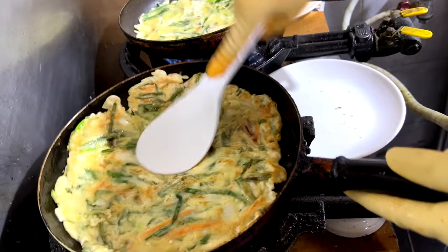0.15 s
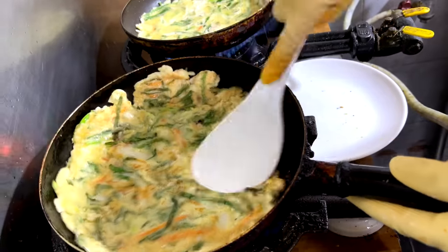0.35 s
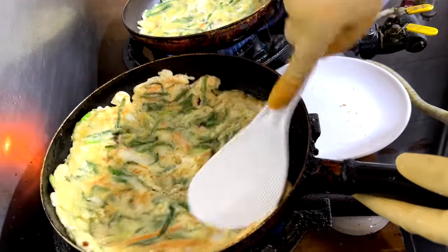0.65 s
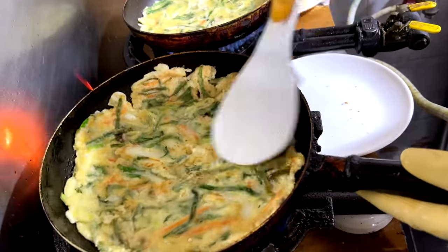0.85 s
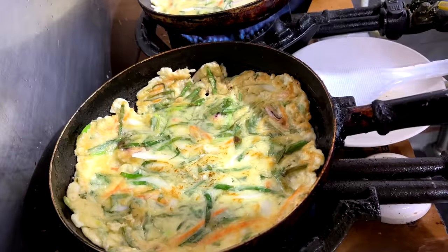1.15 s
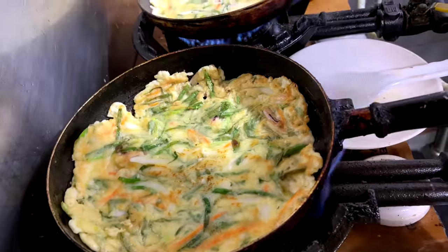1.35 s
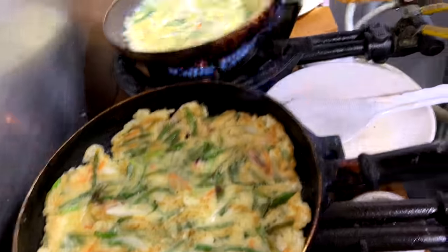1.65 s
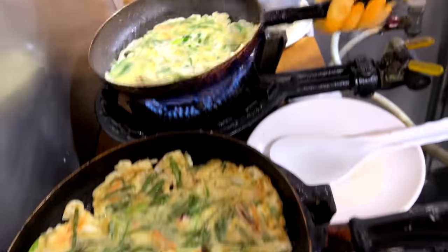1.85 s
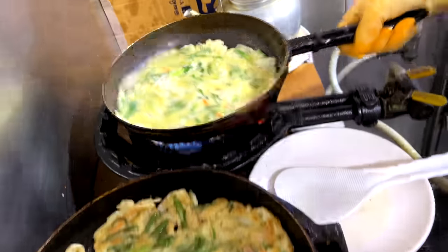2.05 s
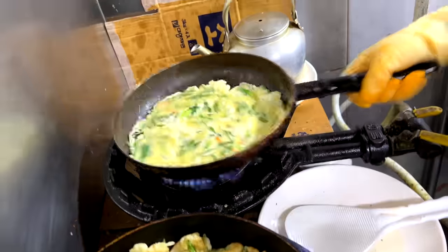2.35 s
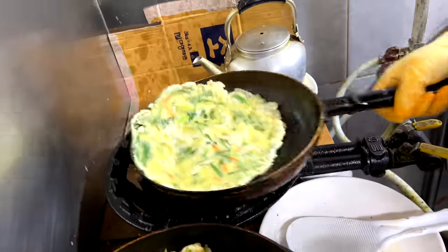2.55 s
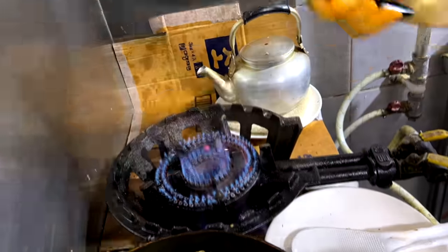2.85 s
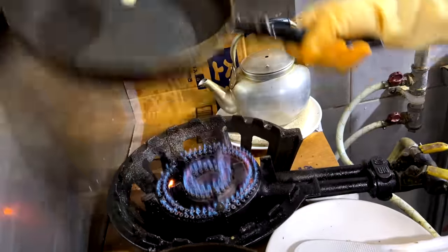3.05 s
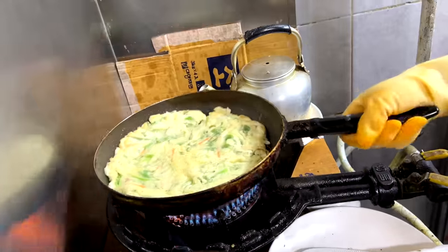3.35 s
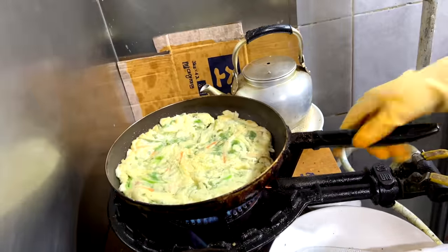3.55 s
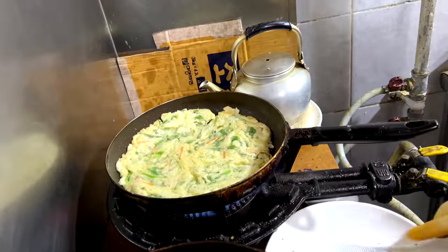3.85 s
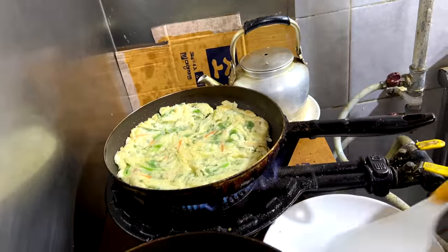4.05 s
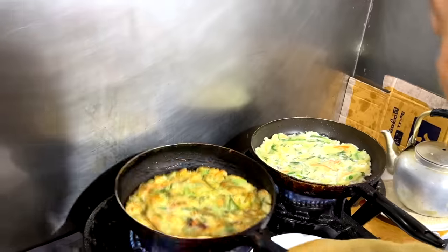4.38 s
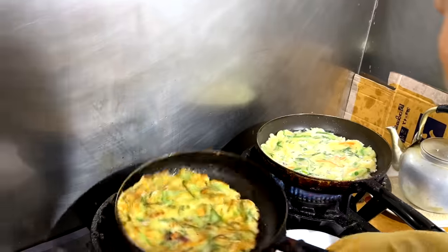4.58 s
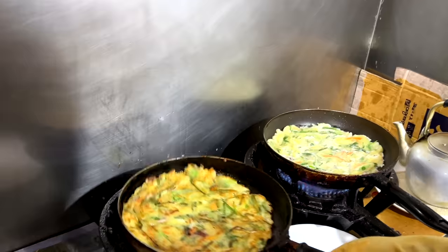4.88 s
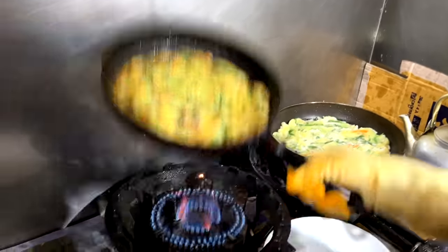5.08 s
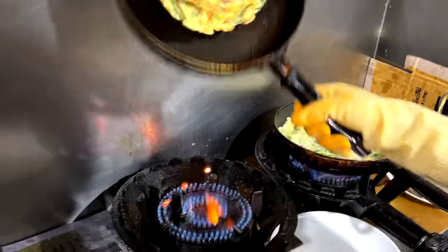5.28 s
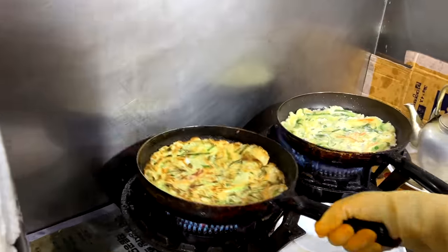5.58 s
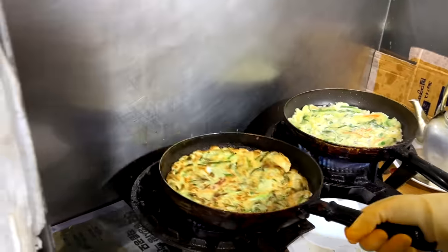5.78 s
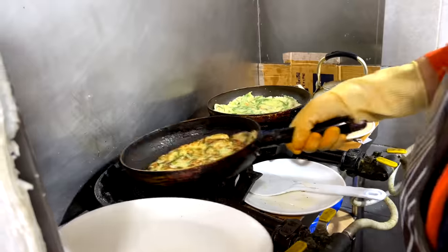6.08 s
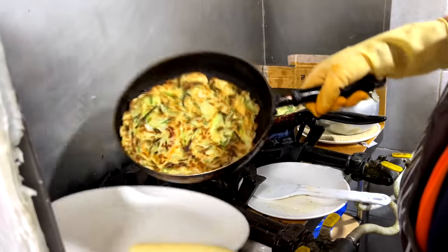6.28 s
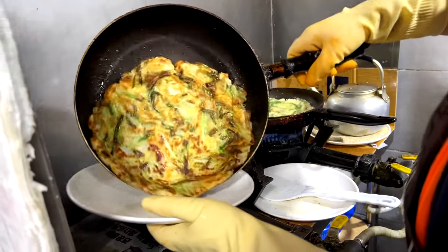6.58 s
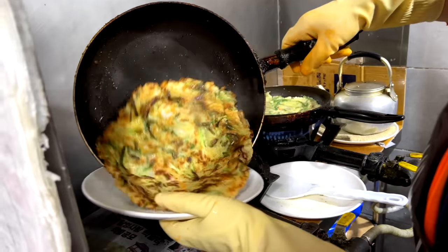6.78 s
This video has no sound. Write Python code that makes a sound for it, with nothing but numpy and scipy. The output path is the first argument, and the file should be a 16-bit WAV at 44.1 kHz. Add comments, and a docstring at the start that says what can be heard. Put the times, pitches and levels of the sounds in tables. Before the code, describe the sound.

Close stereo sound in a tight, steel-walled kitchen corner: vegetable pancakes sizzle brightly in oil. A plastic spatula pats and slides, then a heavy pan groans and squeaks across iron. Pans knock and rattle repeatedly as they are shaken and set down. Frying gradually thins while the low gas flame drone grows. A late toss brings sharp bursts of sizzle, clanks and scraping, ending in mostly burner roar and faint hiss.

```python
"""Pancakes frying over gas burners

Vegetable pancakes sizzle in oiled pans: tiny bursts hiss and crackle, and filtered noise makes the spits.
A plastic spatula slides and pats; pans are shaken and set on iron grates as damped modes plus rattling clicks.
Slides rasp with gritty clicks; a groan, short squeaks and one low thump are wavering tones. The burners drone,
roar and whistle with sines and shaped noise. Steel walls add short, dense reflections; two ports hear it all."""
import sys
import numpy as np
from scipy import signal
from scipy.fft import rfft, irfft
from scipy.io import wavfile
from scipy.ndimage import uniform_filter1d, minimum_filter1d

SR = 44100
rng = np.random.default_rng(int(sys.argv[2]) if len(sys.argv) > 2 else 0)


def store_pcm(level_fs):
    """Save levels as 16-bit WAV."""
    pcm = np.round(np.clip(level_fs, -1, 1) * 32767).astype(np.int16)
    wavfile.write(sys.argv[1], SR, np.atleast_2d(pcm).T)


N = 305613
TIME = np.arange(N) / SR
FREQS = np.fft.rfftfreq(N, 1 / SR)
AGE = np.arange(SR // 2) / SR  # s since the start of an event, half a second long

# Levels in the tables are relative: each layer trims them in the mix.
# presence of the frying: t/s, fine sizzle level/dB
FRYING_LEVEL = [(0, -24), (.65, -24.5), (1.1, -26), (1.33, -28), (1.85, -26), (3.1, -26), (4.08, -28),
                (4.2, -31.5), (5.05, -32), (6.3, -33), (6.93, -30.5)]
# tone of the fine sizzle: f/Hz, density/dB per Hz
SIZZLE_SPECTRUM = [(800, -14), (2000, 0.5), (4000, 2), (5500, -4.5), (7000, -2), (8300, 5.5), (10000, -17),
                   (11800, 6), (13000, 1), (15600, 1)]
# tone of the wet crackle: f/Hz, density/dB per Hz
CRACKLE_SPECTRUM = [(250, -0.5), (500, 4.5), (1000, 2), (1600, 0.5), (2400, 1), (3500, -3), (5500, -2),
                    (9000, -13)]
# share of the frying straight from the pan to the ports, capped at all of it: f/Hz, level/dB
DIRECT_SHARE = [(300, -21), (1500, -1), (5000, -28), (7500, -1.5), (8300, -7), (9000, -3.5), (15500, 4)]
# a pancake is pressed, slid or flipped onto fresh hot oil: t/s, length/s, change of the sizzle/dB
OIL_SURGES = [(.11, 0.019, 3.5), (.225, 0.031, 2), (.585, 0.035, 3.5), (.878, 0.011, -2), (1.74, 0.068, 3),
              (1.9, 0.12, 2.5), (3.17, 0.076, 3.5), (3.35, 0.011, 2), (4.56, 0.089, 6), (4.74, 0.063, 5.5),
              (5.15, 0.055, 4.5), (5.49, .04, 10), (5.64, 0.019, 9.5), (5.885, 0.05, 14)]
# water meeting hot oil: t/s, level/dB, length/s, centre f/Hz
WATER_SPITS = [(.252, -20, .008, 2210), (0.25, -16, 0.005, 8250), (.351, -13, .002, 12000),
               (0.408, -18, .006, 3800), (0.557, -15, .008, 13000), (0.583, -16, .04, 3640),
               (.62, -18, .012, 10000), (.886, -21, .004, 7200), (1.207, -16, .004, 12000),
               (1.413, -18, .002, 9000), (2.101, -13.5, .014, 3200), (2.196, -16, .004, 9050),
               (2.949, -18, .003, 3000), (3.296, -18.5, .004, 8120), (3.358, -11, .004, 13500),
               (3.6, -18, 0.0073, 8200), (3.792, -13.5, .003, 2260), (3.826, -14.5, 0.025, 4470),
               (5.652, -19, 0.059, 5000), (5.888, -11.5, 0.079, 7000), (6.647, -18, .004, 12000)]
# the spatula pats the pancake down: t/s, strength/dB, body note f/Hz, lead of the light touch/s
SPATULA_PATS = [(.079, -3, 533, 0.035), (.322, -15, 650, 0.032), (.986, -4.5, 592, .04)]
# a pan comes down on the grate: t/s, strength/dB, hardness/0-1, body note f/Hz, rim note f/Hz,
# rim mode level/dB, ring time/multiple of the usual, stove thud against the strength/dB
PAN_KNOCKS = [(.102, -9.5, 0.26, 516, 795, -2, 1, -14), (.116, -12, 0.53, 500, 700, 13, 1, -7),
              (.141, -25, 0.5, 433, 720, 3, 1, -1), (.349, -20, 0.55, 450, 820, 3, .7, -0.5),
              (1.38, -2, 0.37, 444, 750, 5, .8, -11), (1.413, -14.5, 0, 423, 720, 3, .7, -7),
              (1.469, -12, 0, 545, 720, 3, .5, -3), (1.512, -1.5, 0.42, 585, 880, 5, .9, -12),
              (1.632, -15, 0.1, 590, 1080, 9, .5, -6), (1.658, -8, 0.13, 560, 835, 0, .6, -5.5),
              (1.692, -19.5, 0.7, 657, 1010, 14, .8, -5), (1.749, -15.5, 0.14, 560, 950, 10, .8, -5),
              (1.802, -11.5, 0.03, 433, 990, 6, 1.1, 0), (1.864, -13.5, 0.28, 540, 1280, 8, .9, -6),
              (1.924, -4, 0.33, 452, 970, 8, .7, -11.5), (1.953, -10.5, 0.44, 573, 940, 18, .8, -7.5),
              (2.069, -8.5, 0.33, 558, 937, 2, .8, -3), (2.233, -5.5, 0.76, 510, 1214, 12.5, .9, -2.5),
              (2.328, -1.5, 0.49, 545, 820, 5, .9, -12), (2.354, -12.5, 0.36, 420, 960, 14, 1, -10.5),
              (2.511, -14, 0.61, 574, 1210, 15, 1, -2.5), (3.234, -15.5, 0.73, 387, 1060, 3, 1, -2.5),
              (3.455, -3.5, 0.72, 618, 1040, 7, .9, -6), (3.47, -10.5, 0.57, 401, 750, 8, 1, 0),
              (3.546, -7.5, 0.32, 592, 784, 4, 1.2, -9), (4.164, -19, 0.3, 542, 818, 6, .8, -19),
              (4.181, -18, 0.5, 455, 736, 1, .8, -16), (4.233, -13.5, 0.83, 393, 930, 13, .8, -6.5),
              (4.285, -19, 0.5, 500, 915, 13, .6, -4), (4.3, -13, 0.51, 510, 759, 0, .7, -5),
              (4.35, -20.5, 0.8, 500, 1140, 15, .8, -10), (4.361, -22, 0.74, 496, 900, 13, 1, -8),
              (4.424, -19.5, 0.62, 530, 923, 13, .7, -6), (4.459, -16.5, 0.55, 517, 906, 3, 1, -5),
              (4.538, -18.5, 0.83, 444, 886, 16, .7, -1.5), (4.645, -19.5, 0.17, 432, 685, 13, 1, -13),
              (5.568, -4.5, 0.38, 528, 760, 11, .7, -9), (5.764, -12.5, 0.96, 572, 910, 11, 1.6, -4.5),
              (5.846, -9.5, 0.6, 690, 1210, -3, .6, -12), (5.878, -10.5, 0.58, 589, 870, 9, .8, -9),
              (5.97, -9.5, 0.63, 624, 890, 1, .9, -5.5), (6.04, -11.5, 0.46, 630, 910, 14, 1.2, -7),
              (6.495, -13, 0.5, 576, 914, -3, 1, -9)]
# ringing of the stove: f/Hz, level/dB, t60/s before the ring multiple
STOVE_MODES = [(155.3, 3, 0.19), (178.3, -2.5, 0.17), (230.4, -8, 0.37), (279, -2, 0.19), (345, -6, 0.14)]
# ringing of the loaded pan: f/Hz, level/dB, t60/s before the ring multiple
PAN_MODES = [(416.6, -1, 0.14), (452, -0.5, 0.11), (517, 3, 0.083), (576, -7, 0.088), (673, -11, 0.11)]
# ringing of the pan's rim: f/Hz, level/dB, t60/s before the ring multiple
RIM_MODES = [(720, 1, 0.077), (799, -2.5, 0.063), (865, -6, 0.1), (969, 2.5, 0.066), (1057, -3, 0.068),
             (1158, -3, 0.045), (1210, -9.5, 0.046), (1314, -10.5, 0.057)]
# ringing of the iron grate with no pan weighing on it: f/Hz, level/dB, t60/s before the ring multiple
GRATE_MODES = [(1465, 1.5, 0.24), (1547, -15, 0.14), (1670, 5, 0.076), (1784, -2, 0.12), (1985, 5.5, 0.14),
               (2260, 0, 0.15), (2445, -10, .14), (3164, -5, 0.12), (3330, -1.5, 0.18), (3680, 6, 0.092),
               (4040, -3, 0.11)]
# tone of the rim's clatter: f/Hz, density/dB per Hz
CLATTER_SPECTRUM = [(220, -34), (380, -9), (600, 8), (780, 5), (1000, 2), (1300, -1), (2000, -23),
                    (3500, -69)]
# tone of the hard contact: f/Hz, density/dB per Hz
CLACK_SPECTRUM = [(700, -14), (1400, 12.5), (2500, 16.5), (4000, 3), (6500, 4.5), (14000, -56)]
# a pan dragged over the grate, or at first the spatula sliding softly:
# t/s, length/s, level/dB, centre f/Hz, ringing against the rasp/dB
SLIDES = [(0.289, 0.14, -19.5, 2630, -18), (1.313, 0.053, -26, 1510, 3), (1.48, 0.015, -14, 2940, -1),
          (1.526, 0.011, -18.5, 2080, 3), (1.601, 0.22, -26, 1490, -5), (1.985, 0.021, -24, 1350, -10),
          (3.204, 0.014, -15.5, 1100, -7), (3.225, 0.0053, -13.5, 3280, -9), (4.168, 0.044, -22, 556, -14),
          (4.231, 0.0061, -20, 1950, -12), (4.3, 0.063, -22.5, 890, -8), (4.537, 0.0051, -16.5, 1560, -16),
          (4.76, 0.015, -24.5, 3000, -7), (4.888, 0.029, -9.5, 2900, -12),
          (4.903, 0.0096, -12.5, 1650, -15), (4.922, 0.028, -15.5, 3030, -13),
          (5.466, 0.059, -22.5, 2520, 0), (5.507, 0.014, -13, 1100, -6), (5.621, 0.08, -19.5, 2230, -5),
          (5.764, 0.018, -11, 2100, -17), (5.89, 0.02, -11, 2500, -10), (5.917, 0.028, -15, 2590, -10),
          (5.895, 0.11, -12.5, 694, -8)]
# patches that rub at once: pitch/multiple of the centre, level/dB
RUBBING_PATCHES = [(.7, -3.5), (1, 3), (1.4, -4.5)]
# the heavy pan groans as it is pulled along, and sinks in pitch as it stops: t/s, f/Hz, level/dB
PAN_GROAN = [(1.32, 503, -80), (1.335, 516, -24), (1.348, 552, -11.5), (1.361, 579, -22), (1.378, 576, -8),
             (1.382, 576, -4), (1.403, 562, -13), (1.418, 576, -9), (1.434, 564, -11), (1.443, 390, -17),
             (1.453, 239, -15), (1.468, 230, -90)]
# short squeaks of iron, and one low thump of the pan's body near 350 Hz:
# t/s, length/s, level/dB, first f/Hz, last f/Hz, roughness/share of f
SQUEAKS_AND_THUMP = [(1.468, 0.035, -12, 560, 544, .05), (1.482, 0.069, -24, 1483, 1450, .006),
                     (1.486, .022, -24, 2520, 2360, 0.0073), (1.51, 0.026, -24, 2364, 2290, 0.011),
                     (4.891, 0.017, -17, 2810, 2760, 0.015), (5.934, 0.031, -20, 3015, 2995, 0.0018),
                     (5.931, 0.021, -7.5, 345, 358, 0.065)]
# nearness and strength of the burners: t/s, drone level/dB
FLAME_LEVEL = [(0, -22), (1.5, -21), (1.7, -21.5), (2.3, -17.5), (3.5, -21.5), (4.0, -20), (4.2, -12.5),
               (5.7, -11.5), (6.05, -15.5), (6.93, -12.5)]
# a weak flame note flutters, a strong one holds steady: drone level/dB, flutter/dB
DRONE_FLUTTER = [(-30, 6), (-27, 2.2), (-11, 0.1)]
# resonances of the flame under the pans: f/Hz, width/Hz (doubled in each of two passes), level/dB
HOLLOW_MODES = [(56, 12, -3), (77.8, 4.6, -8.5), (178.8, 10, -15), (201.8, 22, -7)]
# tone of the burner turbulence: f/Hz, density/dB per Hz
RUMBLE_SPECTRUM = [(20, -25), (35, -33), (55, -1.5), (110, 10), (180, -2), (300, -11), (600, -85)]
# a moving pan fans the flame and it flares: t/s, length/s, rise of the rumble/dB
FLAME_FLARES = [(1.62, 0.05, 6), (4.4, 0.057, 5), (5.97, 0.3, 3.5)]
# tone of the inrushing air: f/Hz, density/dB per Hz
RUSH_SPECTRUM = [(100, 7), (250, 10.5), (600, 1.5), (1000, 1), (2000, -7.5), (5000, -67)]
# whistle of a gas jet: t/s, note level/dB, octave level/dB
JET_WHISTLE = [(1.3, -60, -60), (1.9, -52, -42), (3.1, -45, -47), (4, -39, -50), (4.7, -39.5, -44),
               (5.5, -38.5, -47), (6.2, -37.5, -57), (6.93, -33.5, -57)]
# colour of the left port against the right: f/Hz, level/dB
PORT_COLOUR = [(100, -1), (380, 0), (700, -0.5), (2400, -1), (3300, 2), (4300, 3.5), (5900, 7.5),
               (7200, 5.5), (8700, -4), (15000, 1.5)]

# the wet crackle follows the fine sizzle, but less than dB for dB
SIZZLE_DB, CRACKLE_DB, CRACKLE_FOLLOW = 5.5, -11, 0.45
SURGE_RISE_S, SURGE_FALL_S, SURGE_WET_SHARE = 0.0023, 0.018, 0.52
SPIT_WIDTH = 0.61  # bandwidth of each filter pass as a share of the centre
# droplet level is against the fine sizzle; ranges run from least to most
DROPLET_COUNT, DROPLET_DB, DROPLET_SPREAD_DB = 480, 2, 3.4
DROPLET_HZ, DROPLET_WIDTH, DROPLET_DECAY_S = (2200, 14500), (.2, .7), (.001, .005)
# the pat, and the light touch ahead of it; the follow is dB of touch per dB of pat
PAT_HARDNESS, PAT_RIM_HZ, PAT_LEAD_DB, PAT_RING, PAT_THUD_DB = 0.43, 783, 9, 0.77, -12.5
TOUCH_DB, TOUCH_HARDNESS, TOUCH_RIM_HZ, TOUCH_RING, TOUCH_THUD_DB = -17, 0.85, 1126, 0.28, -1.5
TOUCH_FOLLOW = 0.31
# layer levels of a blow against its strength, from the softest to the hardest contact
BODY_DB, RIM_DB, CLACK_DB = (-2.5, -14.5), (-17.5, -4), (-34, -6)
BOUNCE_BODY_DB = -12.5  # the pan drops back onto the grate once more
GRATE_LOADED = 0.23  # ring time under a pan's weight, as a share of the free one
SCRAPE_WIDTH = 0.44  # bandwidth of each filter pass as a share of the patch's centre
GROAN_ROUGH = 0.024  # pitch jitter as a share of the pitch
DRONE_HZ = 112.7  # centre of the flame's own wavering note
# rumble and rush of air follow the drone: level at a drone of 0 dB, and dB per dB
RUMBLE_DB, RUMBLE_FOLLOW, RUSH_DB, RUSH_FOLLOW = -18, 0.23, -18, 0.54
JET_HZ, JET_WAVER_HZ, JET_FLUTTER_DB = 2737, 3.94, 2.5
PORT_LAG_S, TOP_HZ = 0.000151, 15550


def frying():
    """Steam bubbles burst in flurries, each with a brief spray: fine ones hiss, wet ones crackle lower."""
    fine_db, wet_db = heat()
    fine = bubbles(SIZZLE_SPECTRUM, per_s=20000, spread_db=1.8)
    fine = fine * flurries(per_s=500, decay=.002, depth=.2)
    wet = bubbles(CRACKLE_SPECTRUM, per_s=6000, spread_db=2.2)
    wet = wet * flurries(per_s=170, decay=.003, depth=.22)
    together = flurries(per_s=70, decay=.016, depth=.19)
    fine_gain = undb(fine_db + SIZZLE_DB + 1.1 * walk(18))
    wet_gain = undb(wet_db + 1.0 * walk(14))
    return (fine * fine_gain + wet * wet_gain) * together


def heat():
    """Levels of fine sizzle and wet crackle in dB: both surge when batter meets fresh oil."""
    steady_db, = curves(FRYING_LEVEL)
    surge_db = swells(OIL_SURGES, SURGE_RISE_S, SURGE_FALL_S)
    wet_db = CRACKLE_DB + CRACKLE_FOLLOW * steady_db + SURGE_WET_SHARE * surge_db
    return steady_db + surge_db, wet_db


def bubbles(spectrum, per_s, spread_db):
    """A dense stream of tiny bursts with one spectrum, along three paths to the ports."""
    paths = np.array([grains(N, per_s, spread_db) for _ in range(3)])
    return unit(colour(at_ports(paths), spectrum))


def spits():
    """Drops of water crack open in the oil and flash to steam."""
    out = np.zeros((3, N))
    for s, db, length, hz in WATER_SPITS:
        burst = 1 + 1.0 * np.exp(-AGE / 0.0064)
        envelope = burst * stroke(length, rise=0.00032, fall=0.011)
        add(out, s, undb(db - 6.5) * spray(len(AGE), hz, SPIT_WIDTH) * envelope)
    return at_ports(out)


def droplets():
    """Small drops pop at random, each with its own pitch, width, size and length; most are faint."""
    out, age = np.zeros((3, N)), AGE[:1024]
    fine_db, _ = heat()
    for when, pitch, width, size, life in rng.random((DROPLET_COUNT, 5)):
        i = int(when * N)
        db = fine_db[i] + DROPLET_DB - DROPLET_SPREAD_DB * np.log(max(size, .02))
        hz = np.interp(pitch ** 2, (0, 1), DROPLET_HZ)  # squaring favours low pitches
        share = np.interp(width, (0, 1), DROPLET_WIDTH)
        decay = np.interp(life, (0, 1), DROPLET_DECAY_S)
        add(out, i / SR, undb(db) * spray(len(age), hz, share) * np.exp(-age / decay))
    return at_ports(out)


def spray(n, hz, width):
    """A jet of steam: noise filtered twice around one pitch, along each of the three paths."""
    hz = min(hz, .4 * SR)
    width_hz = min(width * hz, .2 * SR)
    noise = rng.standard_normal((3, n))
    return unit(resonate(resonate(noise, hz, width_hz), hz, width_hz))


def knocks():
    """The spatula touches, then presses the pan against the grate; the pans are shaken and set down."""
    out = np.zeros(N)
    for s, strength_db, body_hz, lead in SPATULA_PATS:
        touch_db = TOUCH_DB + TOUCH_FOLLOW * strength_db
        touch = blow(touch_db, TOUCH_HARDNESS, body_hz, TOUCH_RIM_HZ, PAT_LEAD_DB, TOUCH_RING, TOUCH_THUD_DB)
        pat = blow(strength_db, PAT_HARDNESS, body_hz, PAT_RIM_HZ, PAT_LEAD_DB, PAT_RING, PAT_THUD_DB)
        add(out, s - lead, touch)
        add(out, s, pat)
    for s, *contact in PAN_KNOCKS:
        add(out, s, blow(*contact))
    return out


def blow(strength_db, hardness, body_hz, rim_hz, lead_db, free, thud_db):
    """The contact clacks, the loaded pan rings briefly, the stove thuds and the pan rocks to rest."""
    body_db, rim_db, clack_db = (
        strength_db + np.interp(hardness, (0, 1), ends) for ends in (BODY_DB, RIM_DB, CLACK_DB))
    pan, edge = favour(PAN_MODES, body_hz, lift_db=8), favour(RIM_MODES, rim_hz, lead_db)
    thud = undb(strength_db + thud_db) * ring(STOVE_MODES, free, rise=0.0073, scatter_db=0.5, detune=0.038)
    body = undb(body_db) * ring(pan, free, rise=0.00067, scatter_db=2.0, detune=0.0093)
    rim = undb(rim_db - 1) * ring(edge, free, rise=.0003, scatter_db=2, detune=.01)
    clatter = undb(rim_db - 11.0) * rattle(CLATTER_SPECTRUM, decay=0.015)
    iron = ring(GRATE_MODES, GRATE_LOADED * free, rise=.0003, scatter_db=3, detune=.01)
    iron = undb(clack_db - 4.5) * iron
    clack = undb(clack_db - 1.5) * rattle(CLACK_SPECTRUM, decay=0.014)
    first = thud + body + rim + clatter + iron + clack
    bounce = undb(rim_db - 12.5) * rattle(CLATTER_SPECTRUM, decay=0.03)
    bounce = bounce + undb(-26.0) * iron + undb(BOUNCE_BODY_DB) * body
    late = int(rng.uniform(0.016, 0.041) * SR)
    return first + np.pad(bounce, (late, 0))[:len(AGE)]


def favour(modes, note_hz, lift_db):
    """The way the pan rests on the grate pulls its nearest mode onto a note and resets its level."""
    hz, db, t60 = np.transpose(modes)
    nearest = np.arange(len(hz)) == np.argmin(np.abs(hz - note_hz))
    return np.transpose([np.where(nearest, note_hz, hz), np.where(nearest, lift_db, db), t60])


def ring(modes, free, rise, scatter_db, detune):
    """Damped modes that ring longer the freer they are; every blow lands elsewhere and weights them anew."""
    hz, db, t60 = np.transpose(modes)[:, :, None]
    size, shift = rng.standard_normal((2, len(modes), 1))
    phase = 2 * np.pi * (hz * (1 + detune * shift) * AGE + rng.random((len(modes), 1)))
    mode_db = db + scatter_db * size - 60 * AGE / (t60 * free)
    return impact(np.sum(np.sin(phase) * undb(mode_db), axis=0) * (1 - np.exp(-AGE / rise)))


def rattle(spectrum, decay):
    """A quickly dying train of tiny contacts as iron settles on iron."""
    contacts = colour(grains(len(AGE), per_s=4300, spread_db=4.5), spectrum)
    return impact(contacts * stroke(0, 0.00091, decay))


def impact(x):
    """Scale a blow to rms 1 over its first 30 ms."""
    return x / np.sqrt(np.mean(x[AGE < .03] ** 2))


def scrapes():
    """The spatula, then the pan's base, bites and slides on in slips; rim and grate modes ring anew each time."""
    out = np.zeros(N)
    modes = RIM_MODES + GRATE_MODES
    for s, length, db, hz, ring_db in SLIDES:
        grit = sum(undb(patch_db) * slips(ratio * hz) for ratio, patch_db in RUBBING_PATCHES)
        bite = 1 + 1.6 * np.exp(-AGE / 0.0081)
        level = np.std(grit[AGE < length + .01])
        rasp = grit / level * bite * stroke(length, rise=0.00023, fall=0.015)
        spot = rng.standard_normal((len(modes), 2)) * (3, .012)  # dB, share of the pitch
        rung = np.zeros(len(AGE))
        for (mode_hz, mode_db, t60), (lift, shift) in zip(modes, spot):
            width_hz = np.log(1000) / (np.pi * t60)  # the width that dies away in t60
            mode = resonate(rasp, mode_hz * (1 + shift), width_hz)
            rung += undb(mode_db + lift) * mode * np.sqrt(t60)
        add(out, s, undb(db - 10.5) * (rasp + undb(ring_db) * np.std(rasp) * unit(rung)))
    return out


def slips(hz):
    """One rubbing patch catches and lets go in gritty jerks."""
    catches = flurries(per_s=130, decay=.003, depth=1.6, size=len(AGE))
    grit = grains(len(AGE), per_s=4000, spread_db=1.5) * catches
    return unit(resonate(resonate(grit, hz, SCRAPE_WIDTH * hz), hz, SCRAPE_WIDTH * hz))


def groan_squeaks_and_thump():
    """A sliding pan groans at length, iron squeaks briefly, and the pan's body gives one low thump."""
    groan_hz, groan_db = curves(PAN_GROAN)
    out = rough_tone(groan_hz, GROAN_ROUGH) * undb(groan_db)
    for s, length, db, first_hz, last_hz, rough in SQUEAKS_AND_THUMP:
        hz = np.interp(TIME, (0, length), (first_hz, last_hz))
        tone = rough_tone(hz, rough)[:len(AGE)]
        add(out, s, undb(db) * tone * stroke(length, rise=0.0021, fall=0.002))
    return out


def rough_tone(hz, rough):
    """An uneven tone with a spurt of grit once a cycle, as when iron catches and lets go."""
    phase = 2 * np.pi * np.cumsum(hz * (1 + rough * walk(300))) / SR
    overtones = undb(-35) * np.sin(2 * phase) + undb(-40) * np.sin(3 * phase)
    tone = np.sqrt(2) * (np.sin(phase) + overtones)
    spurt = np.maximum(np.sin(phase), 0) ** 2
    grit = unit(resonate(rng.standard_normal(N) * spurt, 1100, 930))
    return (tone + undb(-19) * grit) * undb(2 * walk(175))


def burners():
    """A flame sings under the pans; turbulence rumbles and air rushes in along with it, and a jet whistles."""
    drone_db, = curves(FLAME_LEVEL)
    return drone(drone_db) + roar(drone_db) + rush(drone_db) + whistle()


def drone(drone_db):
    """The flame's own note: a sine with wavering pitch, which flutters more when weak."""
    flutter_db = np.interp(drone_db, *np.transpose(DRONE_FLUTTER))
    phase = 2 * np.pi * np.cumsum(DRONE_HZ + 2.025 * walk(16)) / SR
    return np.sqrt(2) * np.sin(phase) * undb(drone_db - 3.5 + flutter_db * walk(18))


def roar(drone_db):
    """Turbulence rumbles and excites the hollow under the pans; faint eddies differ between the ports."""
    rumble_db = RUMBLE_DB + RUMBLE_FOLLOW * drone_db + swells(FLAME_FLARES, rise=0.01, fall=0.11)
    hollow = np.zeros(N)
    for hz, width, db in HOLLOW_MODES:
        mode = resonate(resonate(rng.standard_normal(N), hz, 2 * width), hz, 2 * width)
        hollow += undb(db) * unit(mode)
    rumble = unit(colour(rng.standard_normal(N), RUMBLE_SPECTRUM))
    eddies = unit(colour(rng.standard_normal((2, N)), RUMBLE_SPECTRUM))
    return (undb(-3.5) * hollow + undb(-2.5) * rumble + undb(-43) * eddies) * undb(rumble_db)


def rush(drone_db):
    """Air drawn into the flame: noise partly shared by the ports."""
    air = rng.standard_normal(N) + 0.78 * rng.standard_normal((2, N))
    rush_db = RUSH_DB + RUSH_FOLLOW * drone_db
    return unit(colour(air, RUSH_SPECTRUM)) * undb(rush_db + 2.23 * walk(14))


def whistle():
    """A gas jet sings a wavering note and its octave, both fluttering in level."""
    note_db, octave_db = curves(JET_WHISTLE)
    phase = 2 * np.pi * np.cumsum(JET_HZ + JET_WAVER_HZ * walk(150)) / SR
    tones = undb(note_db - 3.0) * np.sin(phase) + undb(octave_db) * np.sin(2 * phase)
    return np.sqrt(2) * tones * undb(JET_FLUTTER_DB * walk(35))


def walls(x, t60):
    """Dense reflections from the steel walls, different at each port, as strong as the source."""
    tail = rng.standard_normal((2, len(AGE))) * undb(-60 * AGE / t60) * (AGE > .001)
    tail /= np.sqrt(np.sum(tail ** 2, axis=1, keepdims=True))
    return signal.fftconvolve(x[None], tail, axes=1)[:, :N]


def at_ports(paths):
    """Three paths to two ports: the direct one reaches the right first, the scattered ones reach one each."""
    direct, left, right = rfft(paths)
    share = np.minimum(response(DIRECT_SHARE, FREQS), 1)
    lag = np.exp(-2j * np.pi * FREQS * np.array([[PORT_LAG_S], [0]]))
    scattered = np.array([left, right]) * np.sqrt(1 - share ** 2)
    return irfft(direct * share * lag + scattered, N)


def undb(db):
    """Decibels to gain."""
    return 10 ** (np.asarray(db) / 20)


def unit(x):
    """Scale to rms 1."""
    return x / np.sqrt(np.mean(x ** 2))


def curves(table):
    """Each column of a timed table, sample by sample."""
    s, *columns = np.transpose(table)
    return [np.interp(TIME, s, c) for c in columns]


def response(points, freqs):
    """Gain of a (f/Hz, level/dB) spectrum at the given frequencies."""
    hz, db = np.transpose(points)
    return undb(np.interp(np.log(freqs + 1), np.log(hz), db))


def colour(x, points):
    """Filter a sound by the spectrum of the points."""
    n = x.shape[-1]
    return irfft(rfft(x) * response(points, np.fft.rfftfreq(n, 1 / SR)), n)


def resonate(x, hz, width_hz):
    """One resonance with gain 1 at its centre."""
    return signal.lfilter(*signal.iirpeak(hz, hz / width_hz, fs=SR), x)


def walk(rate):
    """Smooth chance with a spread near 1: random knots at a rate per second, joined by lines."""
    knots = rng.standard_normal(4096)
    return np.sqrt(3 / 2) * np.interp(TIME * rate, np.arange(len(knots)), knots)


def grains(n, per_s, spread_db):
    """Random clicks of either sign, most of them small and a few large."""
    size = undb(spread_db * np.minimum(rng.exponential(size=n), 6))
    return unit((rng.random(n) < per_s / SR) * size * rng.choice([-1, 1], n))


def flurries(per_s, decay, depth, size=N):
    """Gain that jumps at random moments and then sinks back."""
    starts = (rng.random(size) < per_s / SR) * rng.exponential(size=size)
    return unit(1 + depth * signal.lfilter([1], [1, -np.exp(-1 / (decay * SR))], starts))


def stroke(length, rise, fall):
    """Envelope that rises, holds for a length and dies away."""
    return (1 - np.exp(-AGE / rise)) * np.exp(-np.maximum(AGE - length, 0) / fall)


def swells(table, rise, fall):
    """Change in dB over time from (t/s, length/s, level/dB) events."""
    out = np.zeros(N)
    for s, length, db in table:
        add(out, s, db * stroke(length, rise, fall))
    return out


def add(track, s, sound):
    """Mix a sound in at a time."""
    i = max(int(s * SR), 0)
    track[..., i:i + sound.shape[-1]] += sound[..., :N - i]


def scene():
    """Pans and burners in a tight corner of the kitchen."""
    blows, slides, tones = knocks(), scrapes(), groan_squeaks_and_thump()
    # the corner is too small to spread the lowest notes between the ports
    spread = colour(blows + tones, [(150, -23.5), (570, -4), (1000, -1.0), (2500, 4.5)])
    spread = spread + undb(4.0) * slides
    corner = undb(-0.5) * walls(spread, t60=0.047)
    kitchen = undb(-7.0) * walls(spread, t60=0.14)
    pans = frying() + spits() + droplets() + blows + slides + tones
    return pans + burners() + corner + kitchen


def record(dry):
    """Port colour, a fast limiter for the highest peaks, a hard clip at full scale and a top cut."""
    tilt = np.sqrt(response(PORT_COLOUR, FREQS))  # half the difference to each port
    x = irfft(rfft(dry) * np.array([tilt, 1 / tilt]), N)
    allowed = np.minimum(1, 2.0 / (np.abs(x).max(axis=0) + 1e-9))  # limits at twice full scale
    gain = uniform_filter1d(minimum_filter1d(allowed, size=180), size=180)
    top_cut = signal.ellip(10, .1, 70, TOP_HZ, fs=SR, output="sos")
    return signal.sosfilt(top_cut, np.clip(x * gain, -1, 1))


dry = scene()
out = record(dry)
store_pcm(out)
```